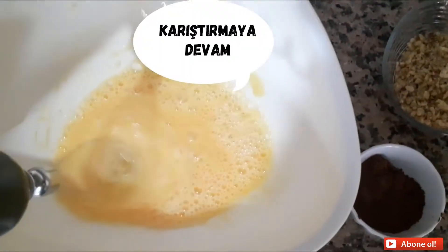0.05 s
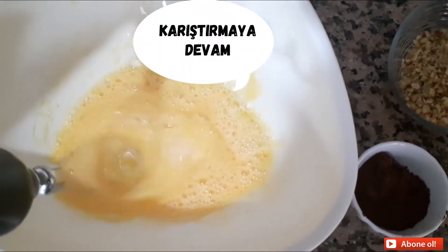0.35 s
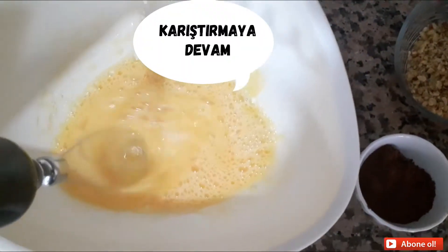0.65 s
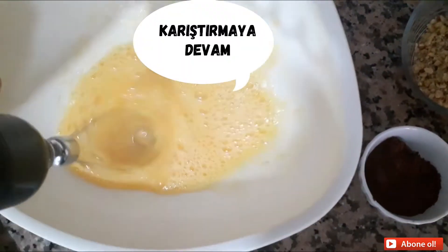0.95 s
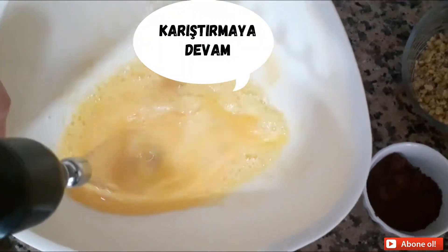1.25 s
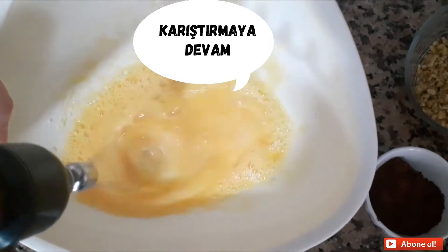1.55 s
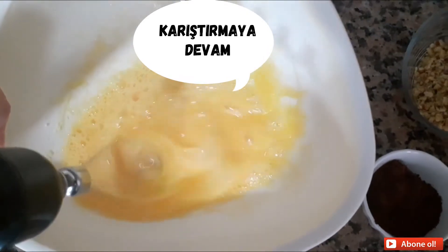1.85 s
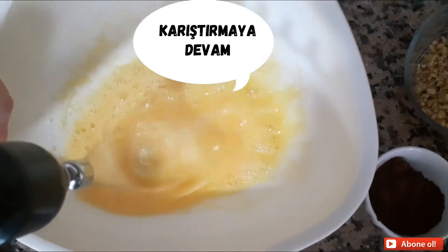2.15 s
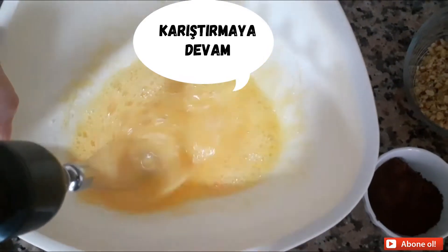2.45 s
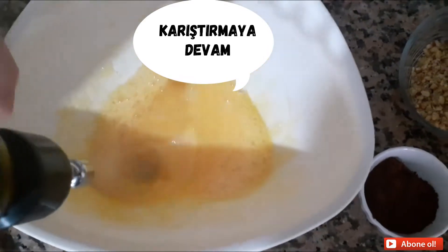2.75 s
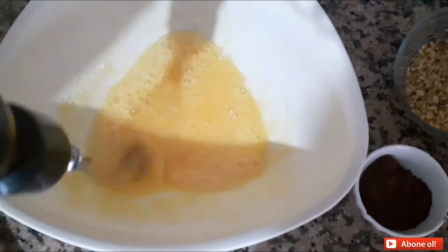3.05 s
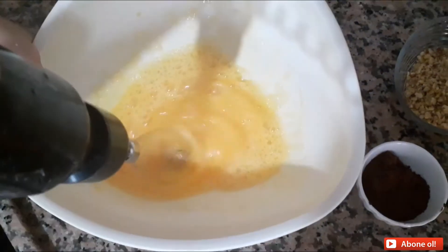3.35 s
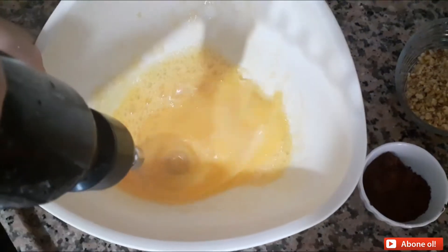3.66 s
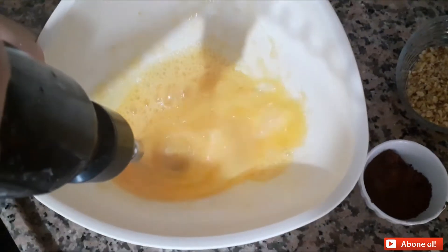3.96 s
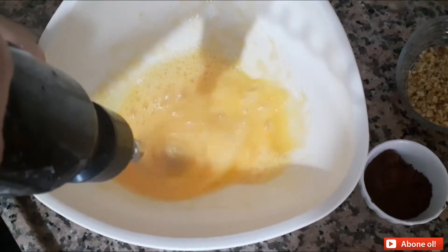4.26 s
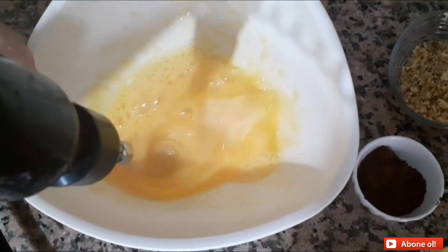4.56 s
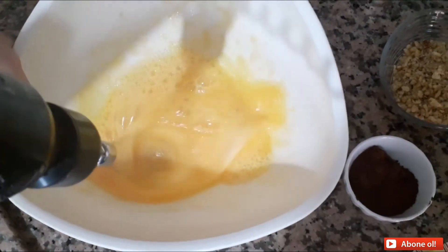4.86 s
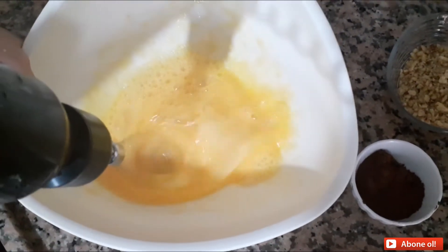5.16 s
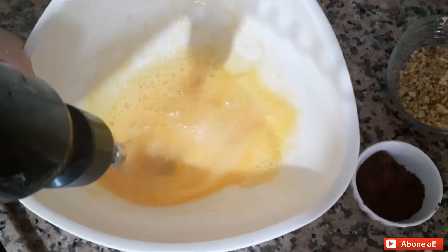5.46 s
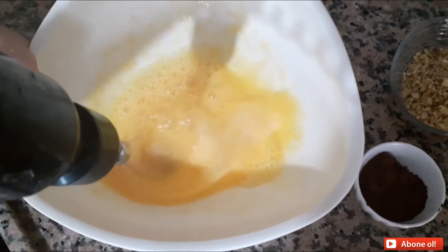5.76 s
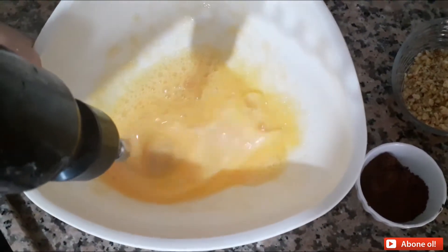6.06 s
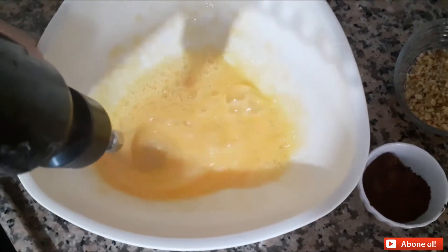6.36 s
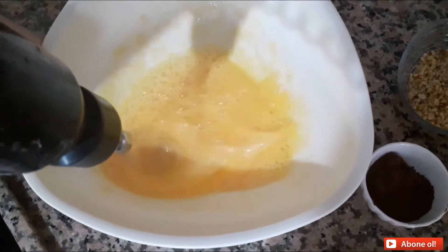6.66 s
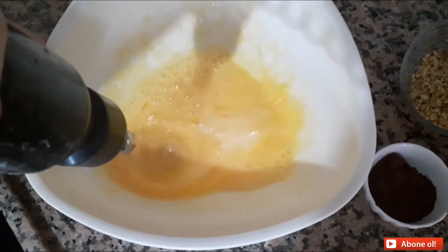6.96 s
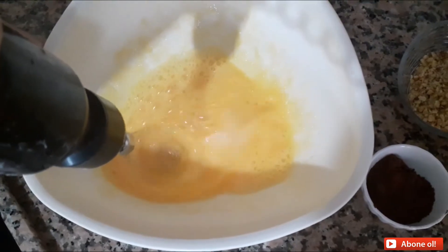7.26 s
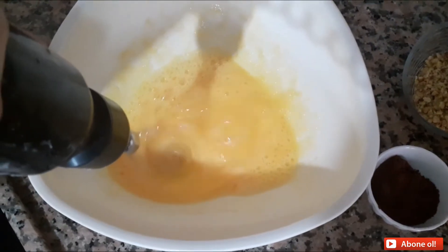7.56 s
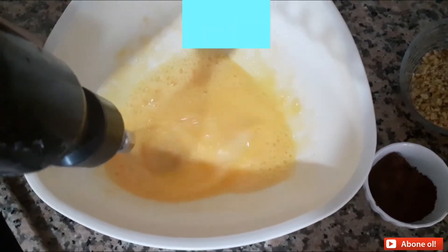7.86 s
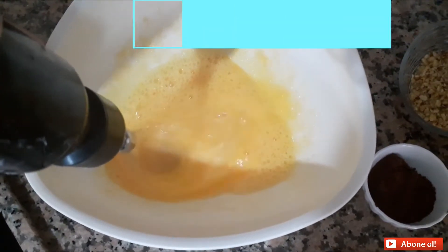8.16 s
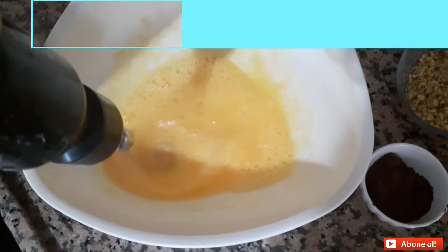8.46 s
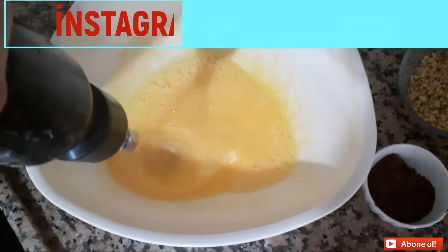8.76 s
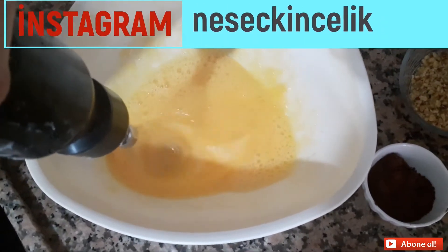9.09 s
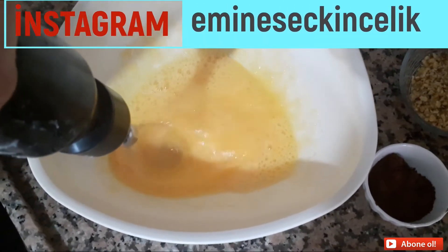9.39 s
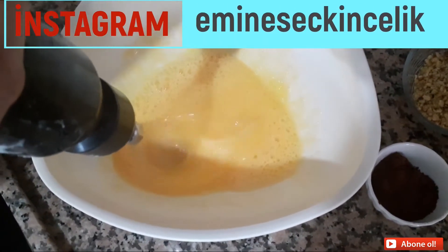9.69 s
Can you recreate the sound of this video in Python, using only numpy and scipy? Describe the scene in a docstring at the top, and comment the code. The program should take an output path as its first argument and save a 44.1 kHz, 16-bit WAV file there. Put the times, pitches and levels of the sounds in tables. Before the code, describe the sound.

Close to the microphone, an electric mixer chatters and hums over the soft, wet churning of eggs in a plastic bowl. The motor speeds up and winds down in short bursts, with sharp switch clicks. During the longest slowdown the whisk hits the bowl with one hollow knock. Then the mixer picks up again and runs steadily, with occasional ticks and small splats, in a small kitchen.

```python
"""A rattling whirr over wet slapping: an electric mixer whisks eggs in a plastic bowl in a small kitchen.
It runs in spurts, coasting between them, knocks the bowl hard once, then runs steadily.
Gears and brushes chatter in the housing, the motor hums and whines, and the whisk slaps the batter
once a turn. Sharp ticks stand out of the rattle, flung batter smacks the bowl, bubbles pop."""
import sys
import numpy as np
from scipy import signal
from scipy.fft import rfft, irfft, next_fast_len
from scipy.io import wavfile
from scipy.ndimage import uniform_filter1d

SR = 44100
rng = np.random.default_rng(int(sys.argv[2]) if len(sys.argv) > 2 else 0)


def generate_wav(sig):
    """Save sig (samples, or channels by samples) to the path in sys.argv[1] as 16-bit PCM at SR."""
    pcm = np.round(np.clip(np.atleast_2d(sig).T, -1, 1) * 32767).astype(np.int16)
    wavfile.write(sys.argv[1], SR, pcm)


N = 433503
T = np.arange(N) / SR
FULL_HZ, GEAR_RATIO = 252.5, 11  # motor top speed; motor turns per whisk turn

# housing spectrum: (frequency [Hz], level [dB])
HOUSING_SPECTRUM = [(500, -19.5), (950, -13), (1400, -5.6), (2000, -1.6), (2650, -6.2), (3700, -5.7),
                    (4400, -4), (5500, -2.7), (7400, 0), (8400, 0.3), (9300, -5.6), (10700, -6.7),
                    (11900, -2), (13400, -8), (15500, -10.5)]
# housing resonances: (centre [Hz], width [Hz], lift [dB])
HOUSING_RESONANCES = [(1930, 70, -3), (2170, 250, 4), (2520, 240, -2.5), (3200, 220, 3.6), (3450, 80, -2.5),
                      (4450, 280, 8), (4665, 70, 3.5), (6040, 45, 7.5), (6695, 130, 3), (7900, 420, 3.5),
                      (12100, 700, 2.5)]


def undb(db):
    """Decibels to gain."""
    return 10 ** (np.asarray(db) / 20)


def unit(x):
    """Scale to rms 1."""
    return x / np.sqrt(np.mean(x ** 2))


def curves(rows):
    """Table columns, interpolated over time."""
    times_s, *columns = np.transpose(rows)
    return [np.interp(T, times_s, column) for column in columns]


def bump(at_s, half_width_s):
    """Gaussian pulse, peak 1."""
    return np.exp(-((T - at_s) / half_width_s) ** 2)


def walk(rate_hz):
    """Random steps, smoothed twice; spread near 1."""
    hold = int(SR / rate_hz)
    steps = rng.standard_normal(4096)[np.arange(N) // hold % 4096]
    return 1.3 * uniform_filter1d(uniform_filter1d(steps, hold), hold)


def slope(points, hz):
    """Level in dB from (Hz, dB) points on a log-frequency axis."""
    points_hz, db = np.transpose(points)
    return np.interp(np.log(hz + 1), np.log(points_hz), db)


def resonant(hz, spectrum, peaks):
    """Gain of a body: broad spectrum plus resonances."""
    lift_db = sum(db / (1 + (2 * (hz - centre_hz) / width_hz) ** 2) for centre_hz, width_hz, db in peaks)
    return undb(slope(spectrum, hz) + lift_db)


def colour(x, gain):
    """Filter by gain(hz)."""
    size = next_fast_len(N + 8192, True)
    return irfft(rfft(x, size) * gain(np.fft.rfftfreq(size, 1 / SR)), size)[:N]


def band(x, lo_hz, hi_hz):
    """Brick-wall band-pass."""
    return colour(x, lambda hz: (hz >= lo_hz) & (hz < hi_hz))


def scatter(x, t60_s):
    """Dense reflections: smear in time, flat spectrum."""
    t = T[:16384]
    echoes = rfft(rng.standard_normal(len(t)) * undb(-60 * t / t60_s))
    response = np.roll(irfft(echoes / np.abs(echoes)), 2048)
    return signal.fftconvolve(x, response)[2048:2048 + N]


def add(track, at_s, sound):
    """Mix a sound into a track."""
    start = int(at_s * SR)
    track[start:start + len(sound)] += sound[:N - start]


def clicks(rate_hz, spread_db):
    """Tiny random impacts, a few much larger."""
    size = undb(spread_db * np.minimum(rng.exponential(size=N), 4))
    return unit((rng.random(N) < rate_hz / SR) * size * rng.choice([-1, 1], N))


def ring(hz, t60_s):
    """One decaying mode."""
    t = T[:SR]
    return np.sin(2 * np.pi * hz * t) * undb(-60 * t / t60_s)


def burst(t60_s):
    """Decaying noise crack."""
    return rng.standard_normal(SR // 4) * undb(-60 * T[:SR // 4] / t60_s)


def bubble(hz, cycles):
    """A bubble rings, rising in pitch; 60 dB down after the given cycles."""
    t = T[:SR // 10]
    life = t * hz / cycles
    return np.sin(2 * np.pi * hz * t * (1 + 0.027 * np.minimum(life, 1))) * undb(-60 * life)


def each_turn(whisk_turns):
    """Rough pattern repeating every whisk turn, with slight shaft play."""
    pattern = rng.standard_normal(size=2048)
    position = (whisk_turns + .001 * walk(16)) % 1
    return pattern[(position * (len(pattern) - 1)).astype(int)]


def kitchen(x):
    """Short, late wash from counter and walls."""
    tail = burst(t60_s=.3) * np.minimum(T[:SR // 4] / .01, 1)
    return signal.fftconvolve(x, tail / np.linalg.norm(tail))[:N]


def ticks():
    """Rattle ticks and switch snaps, coloured by the housing."""
    # sharp ticks in the mixer's rattle: (time [s], relative level [dB])
    rattle_ticks = [(3.9, -6.5), (7.616, -20), (7.7313, -8), (8.038, -11), (8.676, -12), (9.659, -7)]
    # switch snaps on: (time [s], level [dB], t60 [s])
    switch_snaps = [(.989, -21, 0.07), (1.501, -34, 0.031), (3.2206, -21.5, 0.053)]
    out = np.zeros(N)
    for at_s, db in rattle_ticks:
        add(out, at_s, undb(db - 4) * burst(t60_s=0.016))
    for at_s, db, t60_s in switch_snaps:
        add(out, at_s, undb(db) * burst(t60_s))
    return colour(out, lambda hz: resonant(hz, HOUSING_SPECTRUM, HOUSING_RESONANCES))


def pops():
    """Large bubbles pop in the batter, and a few bright splashes ring out with a pitch."""
    # (time [s], relative level [dB], pitch [Hz])
    pitched_pops = [(.66, -31, 738), (1.51, -30, 662), (1.567, -29.5, 610), (2.375, -31, 765),
                    (4.159, -26, 1396), (4.63, -23.5, 1780), (4.831, -29, 721), (6.106, -28, 740),
                    (7.457, -30, 560), (7.729, -23, 2120), (7.855, -27, 1610), (8.026, -28.5, 667),
                    (8.066, -24, 3230), (8.196, -31, 830)]
    out = np.zeros(N)
    for at_s, db, hz in pitched_pops:
        add(out, at_s, undb(db + 0.5) * bubble(hz, cycles=0.071 * hz))
    return out


def splats():
    """Flung batter smacks the bowl wall."""
    # (time [s], level [dB])
    smacks = [(3.016, -27), (4.108, -19.5), (8.156, -19.5), (9.242, -18), (9.766, -17)]
    out = np.zeros(N)
    for at_s, db in smacks:
        add(out, at_s, undb(db) * burst(t60_s=0.037))
    return band(out, 500, 5000)


def knocks():
    """Whisk strikes bowl: a crack, then ringing; soft contact rings only the low modes."""
    # (frequency [Hz], level [dB], t60 [s])
    bowl_modes = [(90.5, -6, 0.36), (139, -23, 0.53), (195, -27, 0.56), (226, -21, 0.72), (288, -24, 0.2),
                  (311, -20, 0.51), (339, -16, 0.14), (496, -12, 0.31), (518, -11, 0.17), (560, 1, 0.12),
                  (575, 8.5, 0.18), (619, -1, 0.28), (653, -6.5, 0.36), (730, -7.5, 0.27), (930, -21, .1),
                  (1113, -2, 0.071)]
    # (time [s], relative ring level [dB], relative crack level [dB], contact time [ms])
    blows = [(2.592, -23, -50, 0.25), (2.6238, -2.5, -25, 0.42), (2.63, 0.5, -9, 0.07),
             (2.901, -30, -44, 0.25), (3.081, -29, -28, 3.3)]
    # (frequency [Hz], level [dB])
    crack_spectrum = [(60, -23), (200, 18.5), (600, 10), (1300, 9.5), (1800, 5.0), (2500, 1.5),
                      (4300, 2), (5500, -20), (12000, -22)]
    modes = sum(undb(db) * ring(hz, t60_s) for hz, db, t60_s in bowl_modes)
    rings, cracks = np.zeros(N), np.zeros(N)
    for at_s, ring_db, crack_db, contact_ms in blows:
        push = np.exp(-T[:SR // 20] / (contact_ms / 1000))
        add(rings, at_s, undb(ring_db - 19) * signal.fftconvolve(modes, push / push.sum()))
        add(cracks, at_s, undb(crack_db) * (burst(t60_s=0.0038) + undb(-13) * burst(t60_s=0.15)))
    # the ringing is thinned in the deep bass
    rings = signal.sosfilt(signal.butter(2, 120, "high", fs=SR, output="sos"), rings)
    return rings + colour(cracks, lambda hz: undb(slope(crack_spectrum, hz)))


def gurgle(count, lo_hz, hi_hz, spread_db):
    """Air pockets of many sizes close in the egg."""
    out = np.zeros(N)
    for when, pitch, rank in rng.random((count, 3)):
        level_db = -spread_db * np.log(rank + 0.017)
        hz = lo_hz * (hi_hz / lo_hz) ** pitch
        add(out, when * T[-1], undb(level_db) * bubble(hz, cycles=45))
    return unit(out)


def splashing_db(speed, drag_db):
    """Batter level: rises with speed and drag, swells with waves, heaves at random."""
    # waves fold into the wires: (time [s], lift [dB])
    sloshes = [(1.54, 4), (1.9, 3), (2.39, 3), (2.52, 4), (2.9, 3), (4.65, 3.5), (4.85, 2), (5.65, 1.5),
               (7.98, 2), (9.08, 2.5)]
    # whisk moves about the bowl: (time [s], level [dB])
    roaming = [(0, -0.5), (1.3, -1.5), (1.7, -1.5), (4.5, 2), (5.5, 1), (6.8, 1.5), (8.2, 0.5), (9.83, 0.5)]
    waves_db = sum(db * bump(at_s, half_width_s=.028) for at_s, db in sloshes) + 1.33 * walk(14)
    roaming_db, = curves(roaming)
    return -43.5 + 0.93 * 20 * np.log10(speed) + drag_db + roaming_db + waves_db


def batter(whisk_turns, level_db):
    """Wires churn the liquid, slapping hardest once a turn; bubbles gurgle above."""
    # (frequency [Hz], level [dB])
    splash_spectrum = [(25, -32), (50, -28), (75, -5), (110, -19), (150, -8.5), (230, -16.5), (310, -13.5),
                       (400, -13), (500, -2), (740, -4.5), (880, -12), (1100, -2), (1600, -85), (4000, -44)]
    # (centre [Hz], width [Hz], lift [dB])
    bowl_resonances = [(480, 95, 2), (563, 16, 9.5), (640, 25, -1.5), (643, 20, 2.5), (727, 160, 6)]
    slap = np.exp(-(whisk_turns % 1) / 0.25)
    spray = clicks(rate_hz=1500, spread_db=1) + undb(-7) * rng.standard_normal(N)
    swirl = undb(-3) * each_turn(whisk_turns)
    churn = scatter((spray + swirl) * (0.74 + slap), t60_s=0.022)
    wet = colour(churn, lambda hz: resonant(hz, splash_spectrum, bowl_resonances))
    wet = wet / np.std(band(wet, 420, 1000))
    bubbles = gurgle(count=1500, lo_hz=700, hi_hz=3100, spread_db=1.4)
    return (undb(0.74) * wet + undb(-1.4) * bubbles) * undb(level_db)


def drive():
    """Presses spin the motor up, releases let it coast. Returns turn rate, time powered, trigger."""
    # trigger: (pressed [s], released [s])
    presses = [(0, .06), (.97, 1.118), (1.485, 1.8), (3.218, 3.252), (3.46, 3.9), (4.4, 9.83)]
    spin_up_s, coast_hz_per_s = .067, 131
    creep_hz, creep_s = 2.6, .9  # slow final approach to full speed
    hz, held_s, trigger = np.full(N, FULL_HZ - creep_hz), np.zeros(N), np.zeros(N)
    for pressed_s, released_s in presses:
        start = int(pressed_s * SR)
        since_s = T[start:] - T[start]
        powered_s = np.minimum(since_s, released_s - pressed_s)
        goal_hz = FULL_HZ - creep_hz * np.exp(-powered_s / creep_s)
        lag_hz = (goal_hz[0] - hz[start]) * np.exp(-powered_s / spin_up_s)
        hz[start:] = goal_hz - lag_hz - coast_hz_per_s * (since_s - powered_s)
        held_s[start:] = powered_s
        trigger[start:] = T[start:] < released_s
    return np.maximum(hz, 1), held_s, trigger


def motor(whisk_turns, speed, held_s, drag_db):
    """Low shaft and gear hum; thin commutator whine that grows while the trigger is held."""
    # (order [per whisk turn], full-speed level [dB], drag response [dB/dB])
    hum_lines = [(3, -73, 0), (6, -62.5, -1.5), (7, -72, 2), (8, -62.8, 0.6), (11, -54.8, .9)]
    # (order [per motor turn], full-speed level [dB])
    whine_lines = [(24, -47.5), (48, -46.5), (49, -51.5)]
    whine_rise_s = 1.2
    hum = sum(undb(db + strain * drag_db + 1.6 * walk(7.2)) * np.sin(2 * np.pi * order * whisk_turns)
              for order, db, strain in hum_lines)
    motor_turns = GEAR_RATIO * whisk_turns + .0012 * walk(16)
    whine = sum(undb(db + 2 * walk(50)) * np.sin(2 * np.pi * order * motor_turns)
                for order, db in whine_lines)
    whine_rise = 1 - np.exp(-held_s / whine_rise_s)
    return np.sqrt(2) * (hum * speed ** 2.8 + whine * speed ** 2 * whine_rise)


def reflections(x):
    """Bowl and counter echoes; stirring shifts their paths, so notches wander."""
    # (delay [ms], gain [ratio])
    echoes = [(1.4, .1), (2.5, .13), (3.9, .15), (6.1, .15)]
    stir_ms, stir_hz = .38, 2.2
    return x + sum(gain * np.interp(T - (delay_ms + stir_ms * walk(stir_hz)) / 1000, T, x)
                   for delay_ms, gain in echoes)


def chatter(whisk_turns):
    """Dense tooth impacts, brush rush and worn-gear buzz."""
    impacts = scatter(clicks(rate_hz=6000, spread_db=4), t60_s=0.0085)
    brushes = undb(-1.2) * rng.standard_normal(N)
    buzz = undb(-6.5) * each_turn(whisk_turns)
    return reflections(impacts + brushes + buzz)


def housing(excitation, upright):
    """The plastic shell rings, most clearly when upright. Returns growl, rattle, hiss."""
    plain = colour(excitation, lambda hz: undb(slope(HOUSING_SPECTRUM, hz)))
    ringing = colour(excitation, lambda hz: resonant(hz, HOUSING_SPECTRUM, HOUSING_RESONANCES))
    flutter_db = 2.2 * walk(45)
    body = plain + upright * undb(flutter_db) * (ringing - plain)
    growl = band(body, 0, 2800) / np.std(band(body, 1200, 2600))
    return np.array([growl, unit(band(body, 2800, 9000)), unit(band(body, 9000, SR))])


def mesh(whisk_turns):
    """Worn teeth sing in rough, narrow bands that track the motor."""
    # (order [per whisk turn], full-speed level [dB])
    mesh_lines = [(78, -48), (88, -46), (97, -44), (122, -53), (140, -51), (194, -46), (292, -46)]
    rough_hz = 380
    tones = 0
    for order, db in mesh_lines:
        angle = 2 * np.pi * order * whisk_turns
        tones = tones + undb(db) * (walk(rough_hz) * np.cos(angle) + walk(rough_hz) * np.sin(angle))
    return tones


def gears(whisk_turns, speed, drag_db, upright):
    """Gear noise, louder and brighter with speed, loaded by the wobbling whisk. Returns mid, side."""
    # growl, rattle, hiss: (full-speed level [dB], speed exponent, drag response [dB/dB])
    noise_bands = [(-35, 1.03, 1.53), (-24.5, 1.31, 0.95), (-30, 1.48, 0.75)]
    # slowing whisk rattles in its socket: (time [s], growl lift [dB])
    socket_rattles = [(.705, 2), (.76, 3), (.845, 2), (.905, 3), (.968, 0), (2.906, 4.5), (2.975, 6),
                      (3.018, 7.5), (3.092, 4), (3.152, 7)]
    # brief level dips: (time [s], depth [dB], half-width [s])
    dips = [(0.2, 3, 0.0089), (2.951, 10, 0.007), (3.06, 3, 0.0094), (3.195, 7, 0.013), (6.034, 8.5, 0.012)]
    wobble_db = sum(db * np.cos(2 * np.pi * order * whisk_turns)
                    for order, db in enumerate([.9, .52, .4, .28], 1))
    cogging_db = 0.11 * np.cos(2 * np.pi * GEAR_RATIO * whisk_turns)
    dips_db = sum(db * bump(at_s, half_width_s) for at_s, db, half_width_s in dips)
    load = undb(wobble_db + cogging_db - dips_db + 0.2 * walk(36) + .25 * walk(300))
    band_gains = np.array([speed ** exponent * undb(db + strain * drag_db + .65 * walk(90))
                           for db, exponent, strain in noise_bands])
    band_gains[0] *= undb(sum(db * bump(at_s, half_width_s=0.012) for at_s, db in socket_rattles))
    mesh_gain = speed ** 1.9 * undb(1.5 * drag_db)
    channels = []
    for _ in range(2):  # the housing radiates from many places: mid and side are unrelated
        noise = np.sum(band_gains * housing(chatter(whisk_turns), upright), axis=0)
        channels.append(load * (noise + mesh_gain * mesh(whisk_turns)))
    return channels


def stereo(mid, side, pan_db):
    """Mid/side to left/right: narrow in bass and top, wide between."""
    # (frequency [Hz], side gain [dB])
    width = [(60, -7), (250, -5), (600, -5.5), (950, -2), (1400, 5), (2100, 0), (2750, 2), (3600, 0.5),
             (7100, 0.5), (7900, -22), (9500, -5), (15000, -5)]
    # (frequency [Hz], left minus right [dB])
    balance = [(100, 1), (600, 2.7), (1200, -1.5), (2500, -2), (5000, -2), (8500, 1)]
    side = colour(side, lambda hz: undb(slope(width, hz)))
    left = colour(mid + side, lambda hz: undb(slope(balance, hz) / 2))
    right = colour(mid - side, lambda hz: undb(-slope(balance, hz) / 2))
    return np.array([left, right]) * undb(np.array([pan_db, -pan_db]) / 2)


def scene():
    """The motor turns the whisk, which times rattle, hum and slaps."""
    # batter drag with whisk depth: (time [s], drag [dB])
    drag = [(0, 1.5), (.6, 1), (.95, 0.5), (1.25, 1.5), (1.45, 0), (1.65, 1.3), (2.3, 0.5), (3.2, 0),
            (3.7, 0.5), (4.35, 0.36), (4.7, 0.7), (5.9, 1), (6.15, -0.2), (8, -1.06), (9.83, -1.1)]
    # mixer raised from a slant: (time [s], uprightness [0-1], left minus right [dB])
    pose = [(0, 0.3, 1), (2.4, 0.25, 0.4), (2.7, 0.26, 0), (3.3, 0.84, -0.4), (5.5, 0.45, -0.5),
            (7, 0.6, -0.7), (9.83, 0.76, -1.1)]
    motor_hz, held_s, trigger = drive()
    speed = motor_hz / FULL_HZ
    drag_db, = curves(drag)
    upright, pan_db = curves(pose)
    whisk_turns = np.cumsum(motor_hz) / SR / GEAR_RATIO
    jolt_db = 2 * trigger * (1 - speed)  # each press jolts the gears, hardest from low speed
    mid, side = gears(whisk_turns, speed, drag_db + jolt_db, upright)
    blows = knocks()
    wash = undb(-14) * kitchen(blows)
    hum = motor(whisk_turns, speed, held_s, drag_db)
    splashing = batter(whisk_turns, splashing_db(speed, drag_db))
    near = hum + splashing + ticks() + pops() + splats()
    spread = scatter(near + undb(-4) * blows, t60_s=0.23)  # knocks stay nearer the centre
    return stereo(mid + near + blows + wash, side + undb(-1.5) * spread, pan_db)


def record(dry):
    """Thin the deep bass, cut the top."""
    bass_hz, top_hz = 70, 16000
    thin = signal.sosfilt(signal.butter(2, bass_hz, "high", fs=SR, output="sos"), dry)
    return signal.sosfilt(signal.ellip(10, .1, 80, top_hz, fs=SR, output="sos"), thin)


dry = scene()
out = record(dry)
generate_wav(out)
```